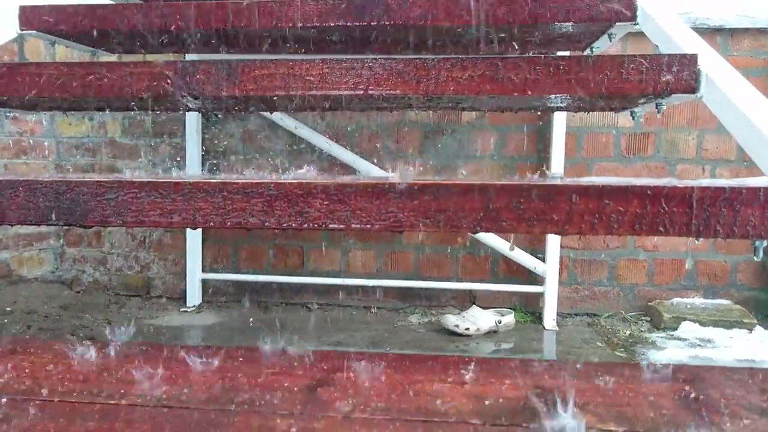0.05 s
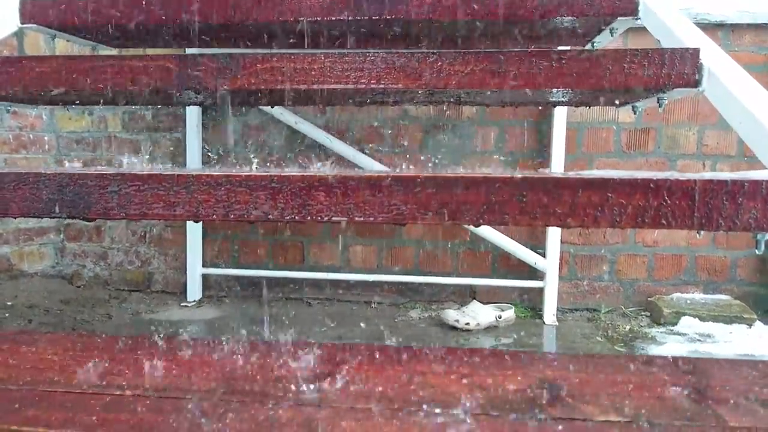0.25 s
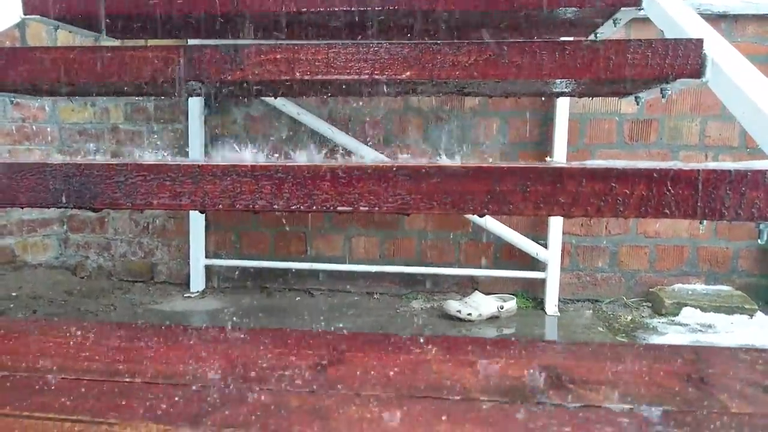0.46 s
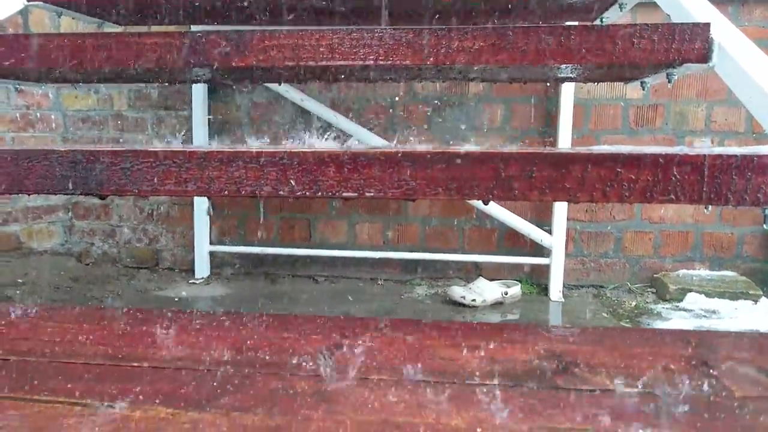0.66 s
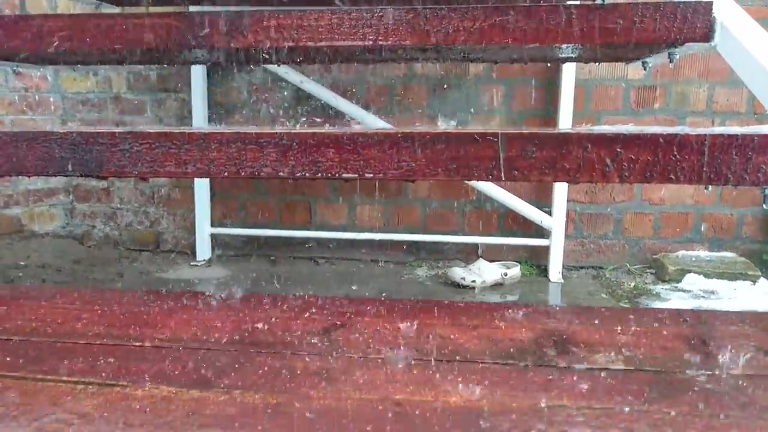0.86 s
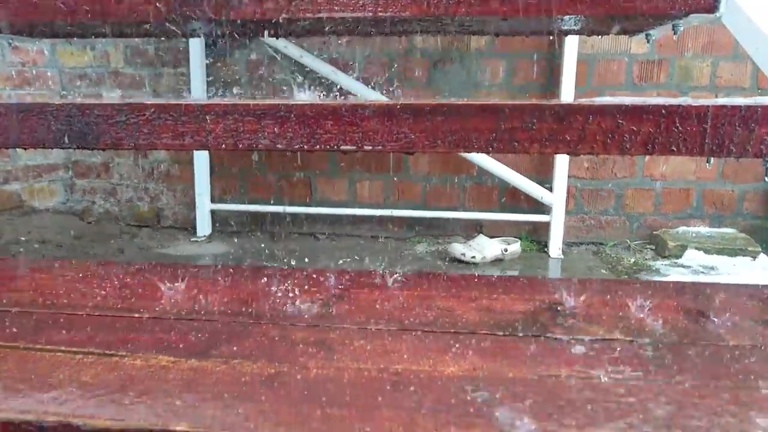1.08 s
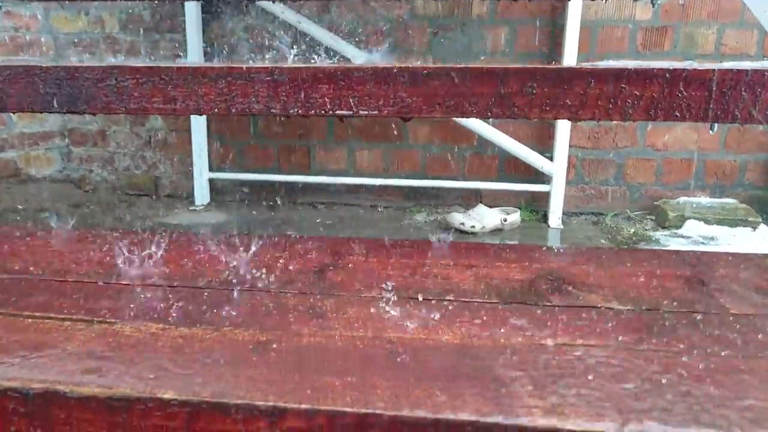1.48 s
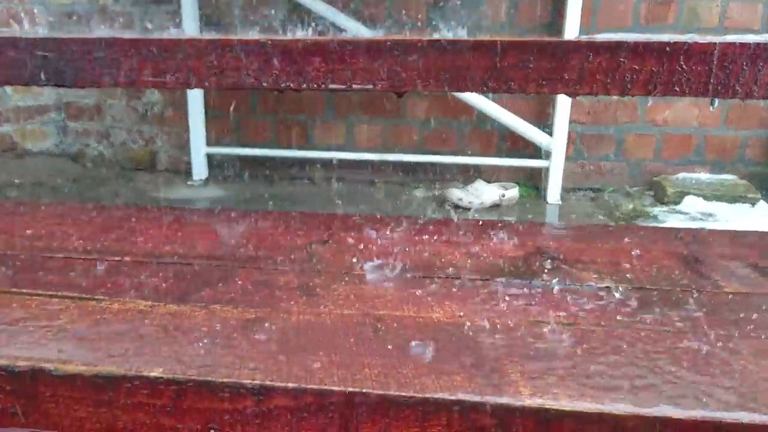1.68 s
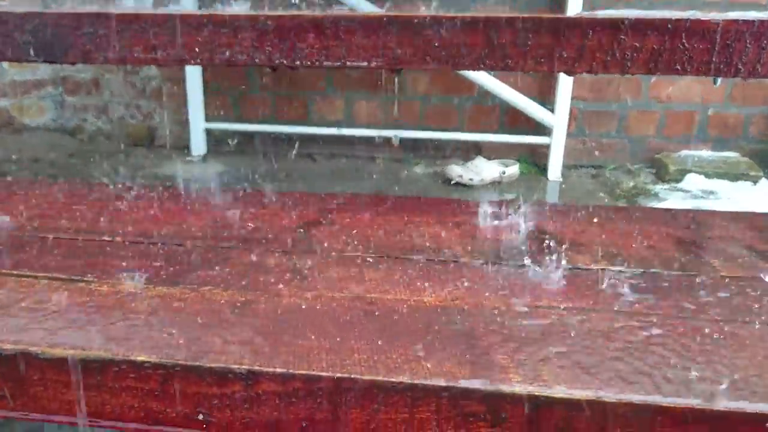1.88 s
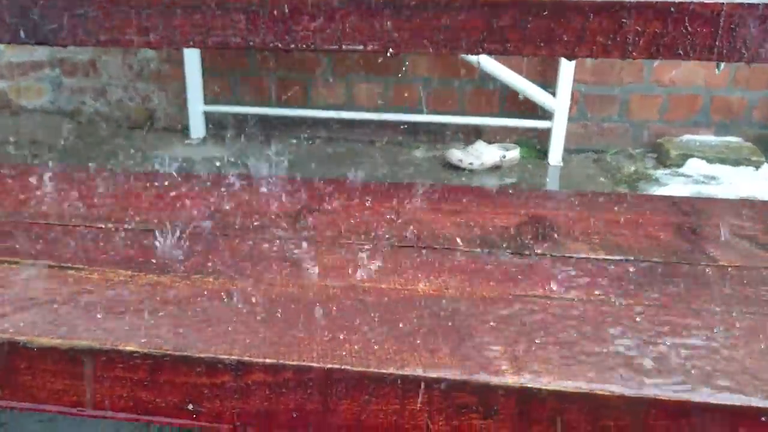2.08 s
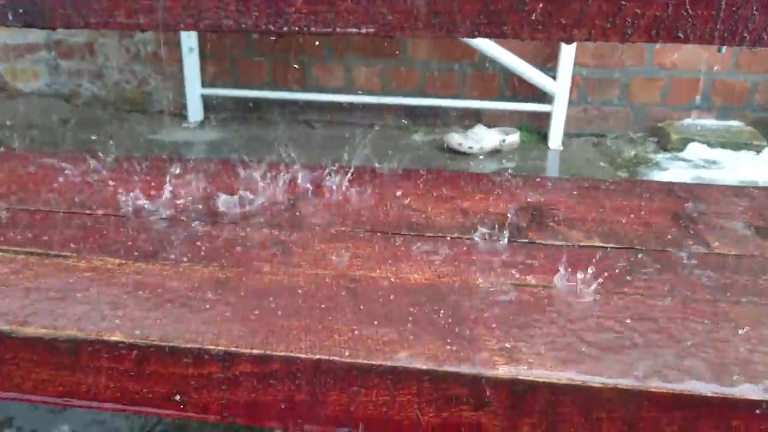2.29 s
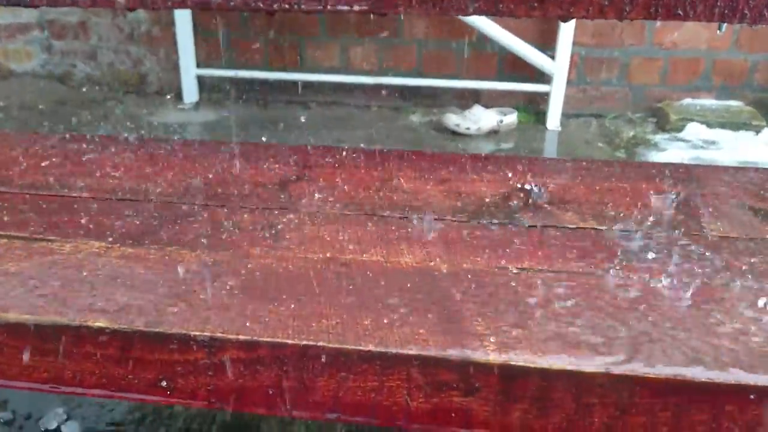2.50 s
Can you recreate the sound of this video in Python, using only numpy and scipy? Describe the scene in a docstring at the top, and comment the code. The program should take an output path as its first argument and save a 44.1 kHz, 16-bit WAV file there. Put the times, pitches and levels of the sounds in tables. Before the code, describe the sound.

Dripping water hits wet wooden boards near the microphone, outdoors beside a brick wall. Sharp, uneven splats and a few tiny plinks stand out from a continuous fine patter, with faint distant dripping and a soft rumble behind.

```python
"""Meltwater drips from a roof onto the wet boards of a wooden bench beside a brick wall.
From the start, small drops patter over a low outdoor rumble and a far hiss of dripping.
Heavy drops land among them: a sharp smack, a short spray and a dull knock on the board;
then the wall slaps back and the yard rings briefly. A few trap air and add a tiny plink.
The hardest hits fall near 0.7, 1.1 and 2.3 s, and the patter runs on to the end."""
import sys
import numpy as np
from scipy import signal
from scipy.fft import rfft, irfft
from scipy.io import wavfile

SR = 44100
rng = np.random.default_rng(int(sys.argv[2]) if len(sys.argv) > 2 else 0)


def store_pcm(level_fs):
    """Save levels as 16-bit WAV."""
    pcm = np.round(np.clip(level_fs, -1, 1) * 32767).astype(np.int16)
    wavfile.write(sys.argv[1], SR, np.atleast_2d(pcm).T)


N = 116865

SPLASH_SAMPLES, CUTOFF_HZ, LEFT_LEADS_S = 1024, 16100, .00007
HIT_GAIN = np.sqrt(SR / 1000)   # gives a hit of energy 1 the energy of a millisecond at rms 1


def from_db(db):
    """Decibels to gain."""
    return 10 ** (np.asarray(db) / 20)


def unit_rms(x):
    """Scale to rms 1."""
    return x / np.sqrt(np.mean(x ** 2) + 1e-20)


def unit_energy(x):
    """Scale to an average energy of 1 a channel."""
    return unit_rms(x) / np.sqrt(x.shape[-1])


def at_hz(curve, hz):
    """Read a curve on a log-frequency axis."""
    points_hz, values = np.transpose(curve)
    return np.interp(np.log(np.maximum(hz, 1)), np.log(points_hz), values)


def bins(size):
    """Frequencies of a spectrum in Hz."""
    return np.arange(size // 2 + 1) * SR / size


def pan(db):
    """Left and right gains; positive leans left."""
    return from_db(np.array([[db], [-db]]) / 2)


def add(out, start_s, sound):
    """Mix a sound in at a time."""
    i = int(np.clip(start_s * SR, 0, N))
    out[:, i:i + sound.shape[1]] += sound[:, :N - i]


def minimum_phase(gain):
    """The filter with this magnitude that keeps the attack tightest."""
    cepstrum = irfft(np.log(gain + 1e-9))
    cepstrum[1:SPLASH_SAMPLES // 2] *= 2
    cepstrum[SPLASH_SAMPLES // 2 + 1:] = 0
    return np.exp(rfft(cepstrum))


def open_air(noise, eq):
    """EQ a stereo noise and spread it: near mono in the lows, wide in the highs; rms 1."""
    # how alike the two sides are: freq_hz, correlation
    stereo_likeness = [(40, 0.94), (130, 0.97), (330, 0.91), (700, 0.1), (1400, 0), (4000, 0.23),
                       (15000, 0)]
    # which way the bed leans: freq_hz, left_over_right_db
    stereo_balance = [(60, 0.5), (160, -2.5), (350, -4), (900, 0), (2000, -1.5), (4000, -10.5), (8000, 0),
                      (13000, 4), (15000, -20)]
    alike, lean_db = at_hz(stereo_likeness, bins(N)), at_hz(stereo_balance, bins(N))
    mid, side = rfft(noise) * eq
    signs = np.array([[1], [-1]])
    spread = np.sqrt(1 + alike) * mid + np.sqrt(1 - alike) * side * signs
    return unit_rms(irfft(spread * from_db(lean_db * signs / 2), N))


def rumble():
    """A low outdoor bed with a few faint drones in it."""
    # tone of the bed: freq_hz, gain_db
    rumble_eq = [(15, -52), (30, -28), (39, -28), (50, -3.5), (64, -0.5), (82, -1), (125, -5), (165, -4.5),
                 (190, -9.5), (275, -3.5), (325, -12), (410, -11), (550, -17.5), (800, -18), (1300, -20.5),
                 (2200, -36), (4000, -47), (8000, -77)]
    # narrow bands of droning noise: centre_hz, width_hz, level_db
    drones = [(71, 24, -62), (243, 28, -71.5), (750, 14, -72)]
    hz = bins(N)
    out = from_db(-52) * open_air(rng.standard_normal((2, N)), from_db(at_hz(rumble_eq, hz)))
    for centre_hz, width_hz, level_db in drones:
        band = 1 / (1 + (2 * (hz - centre_hz) / width_hz) ** 2)
        out += from_db(level_db) * open_air(rng.standard_normal((2, N)), band)
    return out


def far_dripping():
    """Countless far droplets merge into a grainy hiss that swells and sinks."""
    # tone of the hiss: freq_hz, gain_db
    hiss_eq = [(900, -28), (2000, -6), (2700, -8), (4000, -2), (5500, 0.5), (6800, 1), (8300, -5),
               (11000, -9), (13400, -5.5), (14600, -6), (16000, -11.5)]
    # fader ride on the hiss: time_s, gain_db
    hiss_ride = [(0, 3), (.4, 2), (.62, 2), (.85, -3), (1.15, 4), (1.62, 0), (1.82, 4.5), (1.88, -6),
                 (1.97, 5.5), (2.35, -0.5), (2.65, 1)]
    level_db, grain_db = -51.5, 4.2
    grains = rng.standard_normal((2, N)) * from_db(grain_db * np.minimum(rng.exponential(1, N), 6))
    ride_db = np.interp(np.arange(N) / SR, *np.transpose(hiss_ride))
    return from_db(level_db + ride_db) * open_air(grains, from_db(at_hz(hiss_eq, bins(N))))


def yard_reverb(x):
    """Diffuse reflections from bench, wall and ground die away quickly."""
    # tone of the tail: freq_hz, gain_db
    tail_eq = [(300, 16.5), (1200, 5), (3000, 3.5), (6500, -0.5), (9000, -2.5), (15000, -7)]
    return_db, t60_s, onset_s = -11.5, 0.17, 0.0022
    t = np.arange(SR // 2) / SR
    envelope = from_db(-60 * t / t60_s) * (1 - np.exp(-t / onset_s))
    tail = unit_energy(rng.standard_normal((2, len(t))) * envelope)
    tail = irfft(rfft(tail) * from_db(at_hz(tail_eq, bins(len(t)))), len(t))
    return from_db(return_db) * signal.fftconvolve(x, tail, axes=1)[:, :N]


def splash_filter(hz, edge_hz, tilt_db, snap_db):
    """One splash's tone: a steep low cut, a tilted top and the water film's uneven resonances."""
    # tone shared by all splashes: freq_hz, gain_db
    splash_eq = [(300, -1), (1000, -6.5), (4500, 0), (6800, 4.5), (8500, -3.5), (11000, -4), (13400, -13),
                 (15000, -1.5), (16000, -4.5)]
    leak_db, snap_ramp_hz, film_spacing_hz = -44.5, [8600, 15000], 562
    low_cut = np.sqrt(1 / (1 + (edge_hz / hz) ** 14.2) + from_db(leak_db) ** 2)
    high_cut = 1 / np.sqrt(1 + (hz / CUTOFF_HZ) ** 40)
    top_db = tilt_db * np.log2(np.maximum(hz / edge_hz, 1)) + snap_db * np.interp(hz, snap_ramp_hz, [0, 1])
    film_db = np.interp(hz / film_spacing_hz, np.arange(64), rng.uniform(-0.77, 1, size=64))
    return minimum_phase(low_cut * high_cut * from_db(at_hz(splash_eq, hz) + top_db + film_db))


def add_splash(out, start_s, level_db, edge_hz, tilt_db, snap_db, pan_db, echo_db):
    """A drop smacks, spreads into a sheet and tears into duller spray; the wall returns it smeared."""
    sheet_db, sheet_decay_s = -6, 0.0004
    spray_db, spray_decay_s, spray_top_hz = -2, 0.0024, 8000
    wall_delay_s, wall_jitter_s, wall_smear_s = .0088, .0005, 0.0022
    trim_db, wall_trim_db = 0.5, 1.5
    hz, t = np.maximum(bins(SPLASH_SAMPLES), 1), np.arange(SPLASH_SAMPLES) / SR
    noise = rng.standard_normal((5, SPLASH_SAMPLES))
    lag_jitter, wall_jitter = rng.standard_normal(2)
    tone = splash_filter(hz, edge_hz, tilt_db, snap_db)
    smack = (t == 0) + from_db(sheet_db) * unit_energy(noise[0] * np.exp(-t / sheet_decay_s))
    spray = from_db(spray_db) * unit_energy(noise[1:3] * np.exp(-t / spray_decay_s))
    hit = rfft(smack) + rfft(spray) / (1 + 1j * hz / spray_top_hz)
    right_lag = np.exp(-2j * np.pi * hz * LEFT_LEADS_S * (1 + 0.65 * lag_jitter) * np.array([[0], [1]]))
    gain = from_db(level_db + trim_db) * pan(pan_db) * HIT_GAIN
    add(out, start_s, gain * unit_energy(irfft(hit * tone * right_lag)))
    smear = noise[3:] * np.sqrt(t) * np.exp(-t / wall_smear_s)
    slapback = from_db(echo_db + wall_trim_db) * unit_energy(irfft(rfft(smear) * tone))
    add(out, start_s + wall_delay_s + wall_jitter_s * wall_jitter, gain * slapback)


def patter(drops_per_s=105):
    """Small drops all over the boards, each with its own size, tone and place."""
    out = np.zeros((2, N))
    starts_s = rng.random(size=800)[:int(drops_per_s * N / SR)] * N / SR
    traits = np.clip(rng.standard_normal(size=(800, 5)), -2, 2)
    for start_s, (size, edge, tilt, snap, side) in zip(starts_s, traits):
        add_splash(out, start_s, level_db=-42.5 + 3 * size, edge_hz=3180 * 2 ** (0.1 * edge),
                   tilt_db=1.5 + 3 * tilt, snap_db=1 + 3 * snap, pan_db=3 * side, echo_db=-5.5)
    return out


def bubbles(rise_per_s=5):
    """Air caught under a drop rings for a moment, rising in pitch; it reaches the left side first."""
    # plinks of trapped air: start_s, start_pitch_hz, peak_db, attack_s
    plinks = [(0.6754, 6400, -11, 0.00057), (1.2116, 3750, -20.5, 0.00042), (2.1823, 4260, -17.5, 0.00046),
              (2.2943, 3840, -21, 0.0008), (2.478, 2010, -51, 0.0034)]
    out = np.zeros((2, N))
    t = np.maximum(np.arange(2 * SPLASH_SAMPLES) / SR - LEFT_LEADS_S * np.array([[0], [1]]), 0)
    for start_s, pitch_hz, peak_db, attack_s in plinks:
        envelope = (t / attack_s * np.exp(1 - t / attack_s)) ** 2
        chirp = np.sin(2 * np.pi * pitch_hz * t * (1 + rise_per_s * t / 2))
        add(out, start_s, from_db(peak_db) * envelope * chirp)
    return out


def board_knock(decay_s=0.0089):
    """The wet board's short, dense, heavily damped ring; energy 1."""
    # dull tone of the struck wood: freq_hz, gain_db
    wood_eq = [(100, 1), (350, 4), (900, -0.5), (1400, 0.5), (2100, 2), (3000, 2), (5000, -22)]
    t = np.arange(2 * SPLASH_SAMPLES) / SR
    noise = rng.standard_normal((3, len(t)))
    narrow_stereo = noise[0] + .5 * noise[1:]
    ring = irfft(rfft(narrow_stereo) * from_db(at_hz(wood_eq, bins(len(t)))))
    return unit_energy(ring * np.exp(-t / decay_s))


def near_drops(knock_trim_db=3.5):
    """The heavy drops up front; each splashes and knocks the board."""
    # hits on the bench: start_s, level_db, low_edge_hz, tilt_db_per_octave (above the edge),
    # treble_snap_db, left_over_right_db, wall_echo_db (relative to the hit), knock_db
    hits = [(0.0274, -28.5, 3370, -4.5, 17, -2, -18, -46.5), (0.091, -21, 3240, -1.5, 9, -7, -21, -50.5),
            (0.1993, -23.5, 4520, -2.5, -3, -3, -11, -46), (0.218, -32.5, 3400, 6, 5, 1, -19, -67),
            (0.2508, -27, 4500, -4.5, 4, -2.5, -9, -51), (0.3042, -20.5, 3400, 8, -18, 0, -18, -56),
            (0.4476, -24.5, 3200, 0.5, -15, -4, -9.5, -66), (0.524, -33.5, 3420, 6, 1, -9, -5, -61),
            (0.5435, -29, 4130, 1, 3, -5, -20, -50.5), (0.549, -29, 4700, -4, -4, 5.5, -2, -67),
            (0.5611, -32, 5370, -10, 1, -6, -9, -56), (0.5927, -33.5, 4500, 0, -4, 3, -8, -63),
            (0.6731, -12.5, 3300, 2, -14, -4, -13.5, -53), (0.6753, -16, 3230, -4, -14, 1, -11, -63),
            (0.6981, -30, 4140, 14, 2, -3, -15, -49.5), (0.715, -34, 3400, 11, 1, -2, -5, -62),
            (0.7495, -18, 3130, 10.5, 1, 1, -18, -54), (0.7687, -33.5, 3430, 4, 3, -12.5, -13, -59),
            (0.867, -39, 4200, 2, -3, 8, -19, -68), (0.876, -35, 3300, 3, 0, -12, -32, -61),
            (0.9032, -27.5, 3380, 3, -7, 2, -12, -59), (0.9118, -19.5, 3960, 0, -16, -4.5, -10, -51),
            (0.929, -30, 4070, 3, -16, 9, -17, -67), (0.9831, -26, 4760, -4.5, -3, -2, -28, -68),
            (1.0225, -36, 3900.0, 19, -13, 11, -20.0, -62), (1.0275, -22.5, 3430, -2.5, 5, -3.5, -9, -53),
            (1.094, -12.5, 3020, -1.5, 8.5, -1.5, -11, -41), (1.0963, -29, 3000, -4, 2, -3, 4, -48),
            (1.1354, -31, 3770, 0, 13, -2, -25, -50), (1.1817, -29.5, 4570, 3, -8, -3, -12, -59),
            (1.1913, -31, 2960, -4, 13, -2, -10, -49), (1.2111, -15, 2560, -4.5, -15, -3.5, -13.5, -36.5),
            (1.242, -22, 4360, -5, 3, -1, -4, -48), (1.2799, -33, 3400, 3, 7, 1, -24, -54),
            (1.3628, -35.5, 4300, 13, -6, 4, -15, -67), (1.376, -27, 3780, -12, 17, -3.5, -8, -46.5),
            (1.4526, -31.5, 3700, -3.5, 2, -2.5, -5, -49.5), (1.5075, -34, 4620, 3, -15, 12, -9, -63),
            (1.5135, -19.5, 4400, 0, 4, -2, -21, -55), (1.533, -26, 4380, 11, -5, -1, -6, -48),
            (1.54, -28, 4000, -7, 12, -4.5, -17, -49), (1.6006, -34, 3800.0, 18, -12, -5, -11, -68),
            (1.6184, -26.5, 2400, 0, 9.5, -1.5, -8, -54), (1.6583, -35, 4050, 7, -14, 0, -9, -56.5),
            (1.7678, -15.5, 3830, 5.5, 13.5, -3, -29, -61), (1.8105, -21.5, 4060, 6.5, -12, -1.5, -12, -43),
            (1.929, -26.5, 4600, -11, 3, -4, -15, -46.5), (1.9864, -25, 4960, -39, 9, -9, -24, -46.5),
            (2.0071, -23.5, 4800, -1, -4, 0, -24, -58), (2.055, -37.5, 3520, -5, 4, -4, -10, -51.5),
            (2.1418, -30, 3260, 0, -20, -1, -9, -51), (2.1823, -23.5, 3800, -12, 19, -2, -12, -65),
            (2.199, -31, 3400, 13, -21.0, 0, -6, -65), (2.232, -33, 3900.0, -5, -13.0, -3, -18, -62),
            (2.2368, -25.5, 4570, -9, 5, -2, -11, -57), (2.2411, -23.5, 5550, -9, -4, -3, -16, -62),
            (2.2874, -26.5, 3140, 5, -4, -2, -10, -58), (2.2935, -21.5, 3820, -13, 18, -5, -8, -46),
            (2.3042, -26, 4000, -4, 9, -17, -32, -53), (2.3059, -10.5, 4700, 1.5, -15, -0.5, -30, -44.5),
            (2.3607, -17, 3700, -12, 11, -2.5, -9.5, -44), (2.4592, -36, 4200, 10, 15, -2, -15, -58),
            (2.491, -24.5, 3400, 12.5, -2, -1, -25, -46), (2.5056, -32, 3460, 6, 9, -2, -27, -68)]
    out = np.zeros((2, N))
    for start_s, level_db, edge_hz, tilt_db, snap_db, pan_db, echo_db, knock_db in hits:
        add_splash(out, start_s, level_db, edge_hz, tilt_db, snap_db, pan_db, echo_db)
        add(out, start_s, from_db(knock_db + knock_trim_db) * HIT_GAIN * pan(pan_db) * board_knock())
    return out


def scene():
    """Drops and their reverb over the hiss and rumble."""
    drops = near_drops() + patter() + bubbles()
    return drops + yard_reverb(drops) + far_dripping() + rumble()


def record(dry):
    """Soft clipping rounds the hardest peaks, then a steep low-pass trims the top."""
    ceiling = .9
    rounded = ceiling * np.tanh(dry / ceiling)
    low_pass = signal.firwin(201, CUTOFF_HZ, fs=SR)
    return signal.fftconvolve(rounded, low_pass[None], "same", axes=1)


dry = scene()
out = record(dry)
store_pcm(out)
```